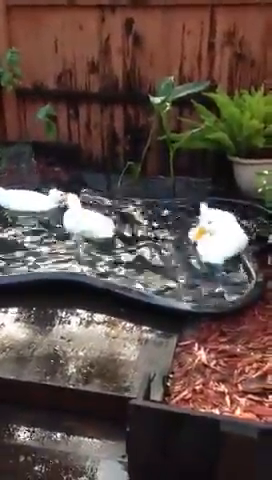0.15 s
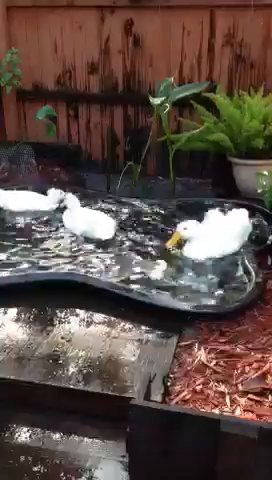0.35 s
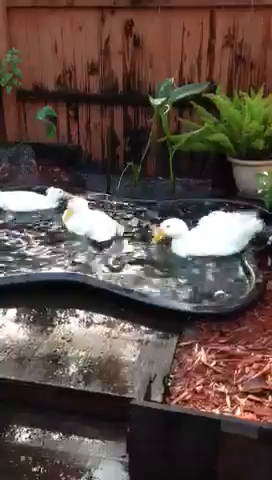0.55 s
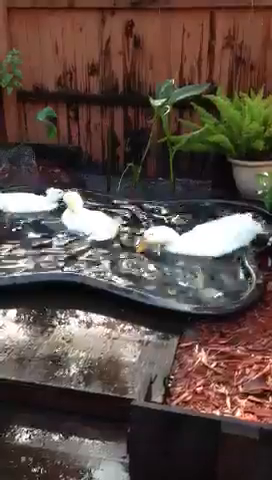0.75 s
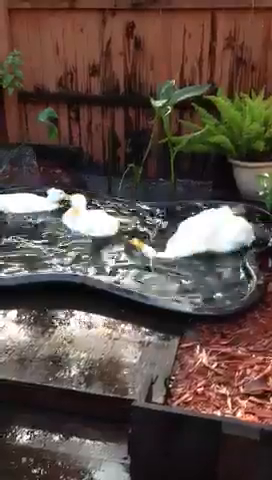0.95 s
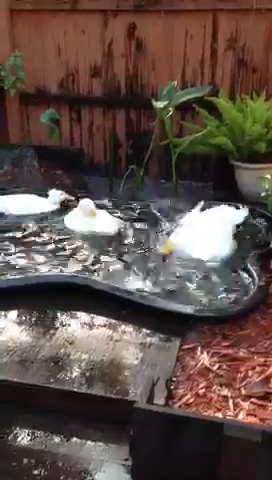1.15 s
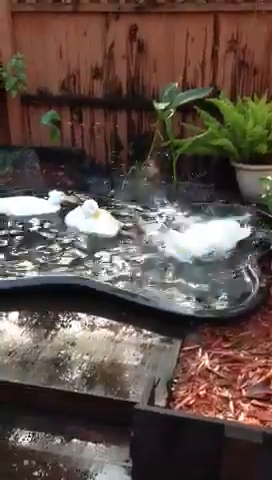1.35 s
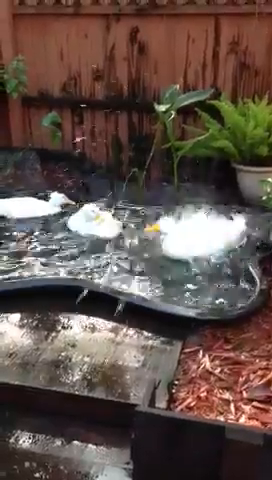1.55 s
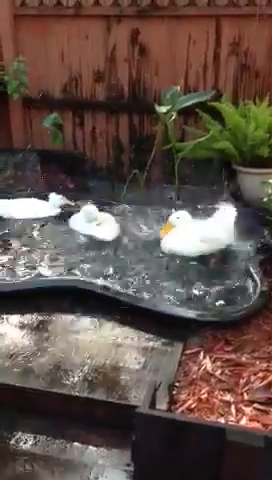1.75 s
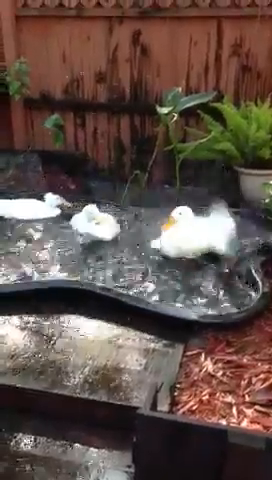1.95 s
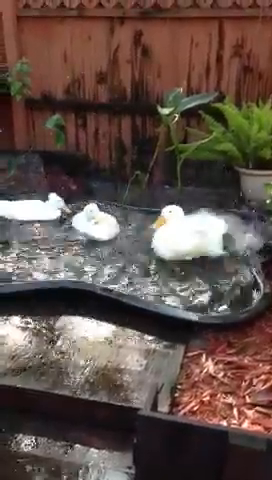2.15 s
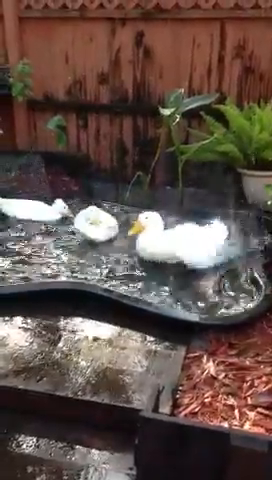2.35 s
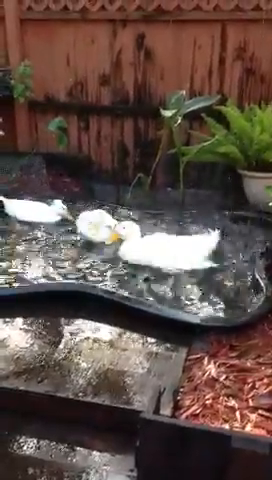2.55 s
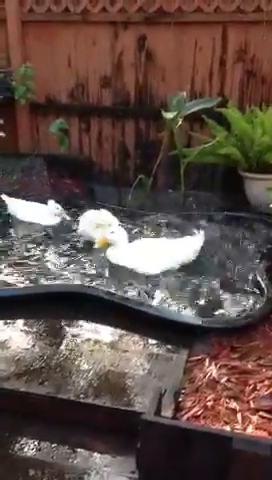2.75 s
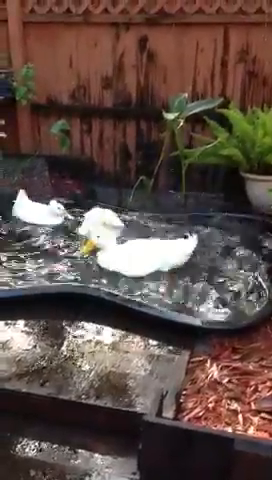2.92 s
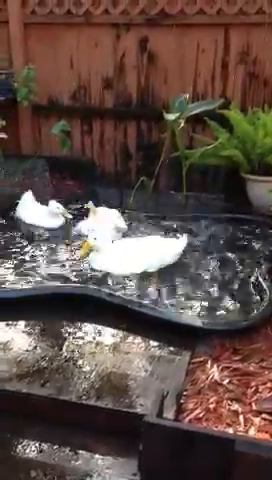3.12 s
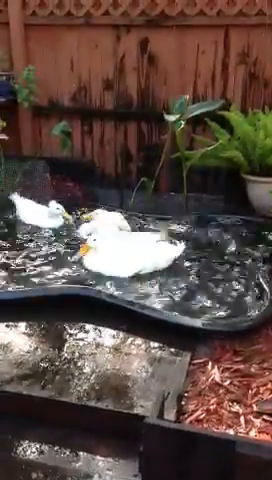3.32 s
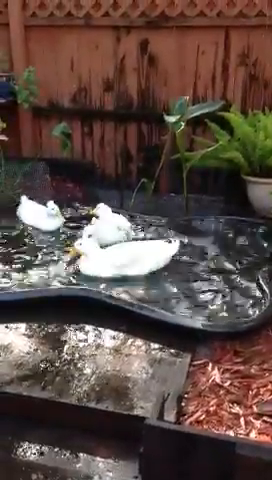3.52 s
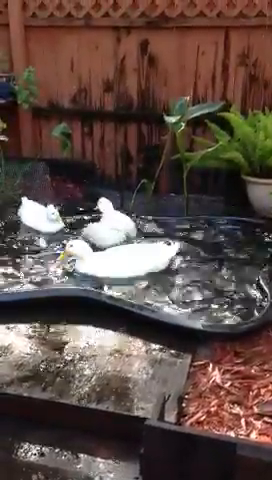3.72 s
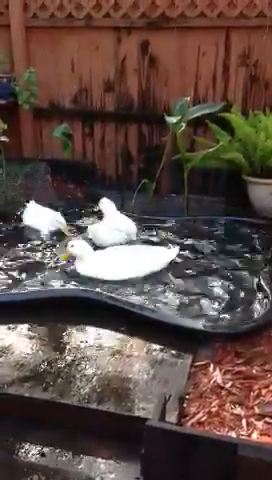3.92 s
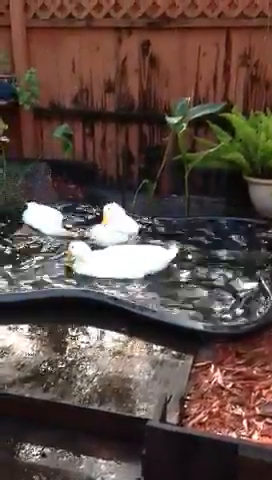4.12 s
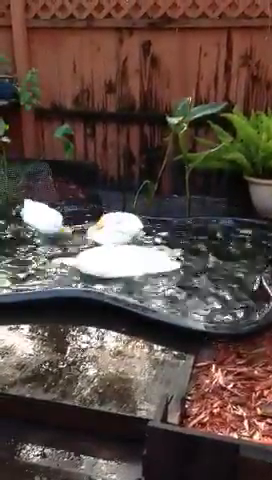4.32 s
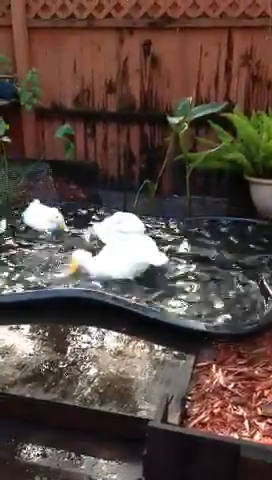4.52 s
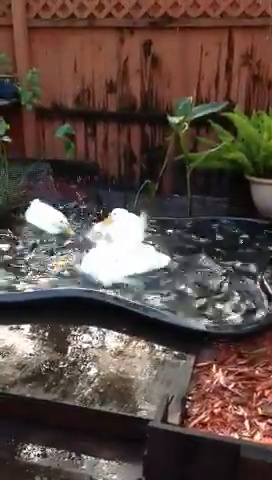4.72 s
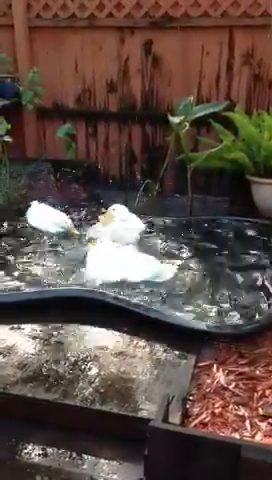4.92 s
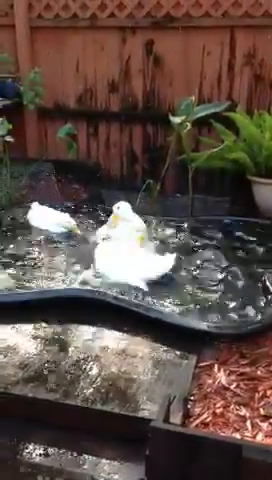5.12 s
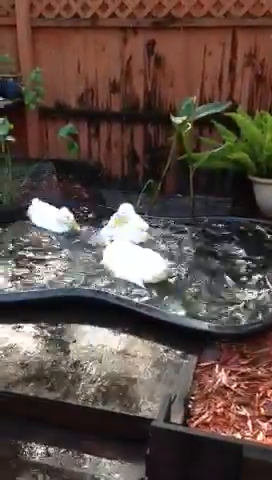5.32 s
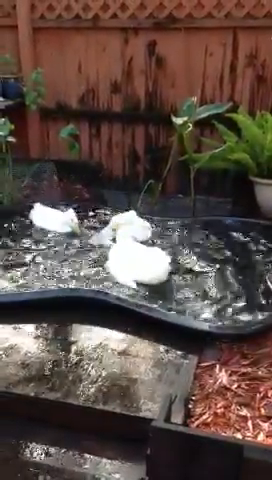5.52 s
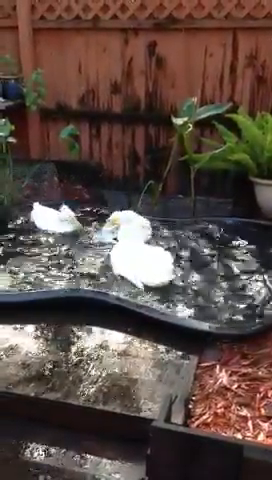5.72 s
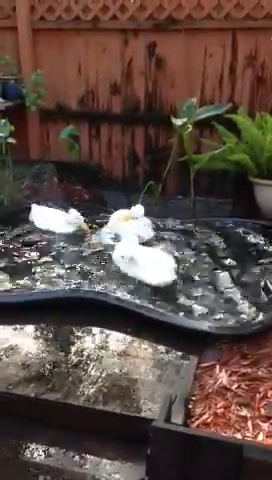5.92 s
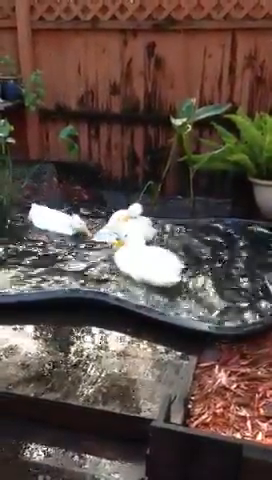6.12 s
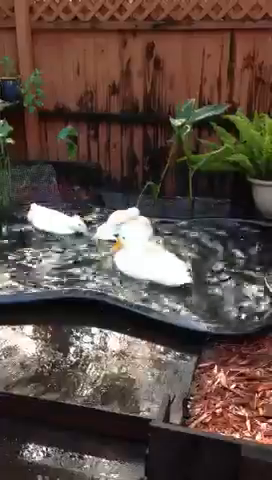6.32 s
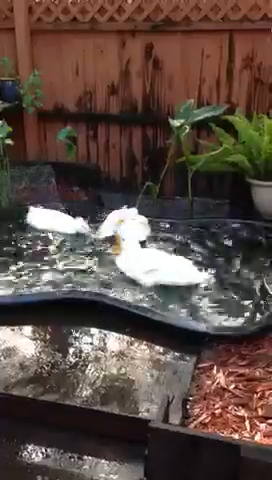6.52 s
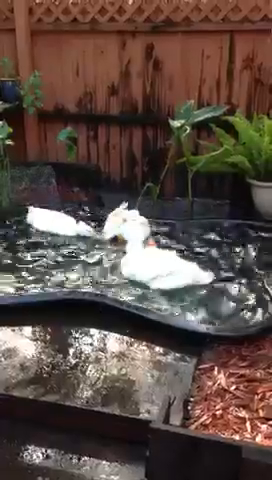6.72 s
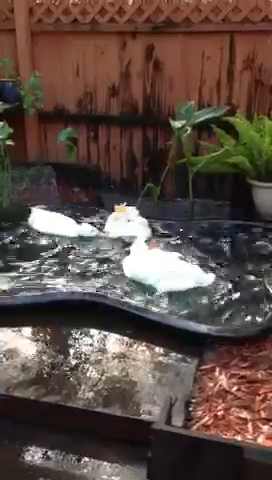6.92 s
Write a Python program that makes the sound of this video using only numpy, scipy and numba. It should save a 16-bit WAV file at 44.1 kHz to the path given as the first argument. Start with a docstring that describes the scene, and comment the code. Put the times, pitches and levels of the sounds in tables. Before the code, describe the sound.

Ducks bathe in a small garden pond, wings slapping and water splashing in bursts, with droplets, bubbling, brief low grunts and a distant machine hum.

```python
"""Ducks bathe in a small plastic garden pond a few metres from a phone. Their wings slap the water:
each slap is a snap, a ragged crack of noise and a low thump. Drops, bubbles and other short tones ring,
steady or gliding in pitch, and stirred water is many such rings mixed with hiss. A duck grunts, as pulses
and noise through a throat, and mutters in throbbing tones. Beyond the fence a machine idles as a set of
wavering tones, over distant traffic made of coloured noise."""
import sys
import numpy as np
from scipy import signal
from scipy.fft import rfft, irfft
from scipy.io import wavfile
from scipy.ndimage import uniform_filter1d
from numba import njit

SR = 44100
rng = np.random.default_rng(int(sys.argv[2]) if len(sys.argv) > 2 else 0)


def waveform_to_disk(signal):
    """Save audio, clipped to [-1, 1], as 16-bit WAV at the path in sys.argv[1]."""
    frames = np.transpose(np.atleast_2d(signal))
    scaled = np.clip(frames, -1, 1) * 32767
    samples = np.round(scaled).astype(np.int16)
    wavfile.write(sys.argv[1], SR, samples)


N = 306936  # length of the scene in samples

# wing and body slaps: t/s, crack level/dB, centre f/Hz, width/octaves, time to fall 60 dB/s,
# snap over crack level/dB, thump level/dB, thump f/Hz
SLAPS = [(1.268, -30, 2760, 1.16, 0.043, 0, -40, 196), (1.276, -22, 2070, 0.38, 0.024, 5, -39.5, 315),
         (1.2812, -26, 1960, 1.25, 0.017, 7, -62, 250), (1.284, -28, 7200, 0.55, 0.022, 1, -60, 250),
         (1.417, -41, 7000, .8, 0.02, 3, -45.5, 257), (1.477, -35, 3680, 0.86, 0.023, 5, -51, 250),
         (1.618, -32, 2380, 0.96, 0.018, 8, -60, 300), (1.625, -36, 1300, 0.86, 0.033, 5, -53, 298),
         (1.652, -40, 3000, 0.82, .02, 5, -60, 250), (1.713, -37, 2030, 0.46, 0.17, 11, -49, 255),
         (1.78, -31, 5500, 1.2, 0.023, 2, -45.5, 270), (1.906, -31.5, 2000, 1.8, 0.057, 4, -60, 250),
         (1.9133, -34.5, 2780, 2.6, 0.035, 18.5, -31, 200),
         (2.031, -19.5, 2450, 1.64, 0.024, 5.5, -29, 201), (2.161, -30, 1980, 2, 0.05, 8, -36.5, 284),
         (2.164, -36.5, 5700, 0.74, 0.027, 4, -58, 250), (2.28, -33, 1500, 2.9, 0.021, 3, -36.5, 172),
         (2.2852, -22.5, 2960, 1.66, 0.018, 6, -58, 252), (2.4317, -26.5, 2500, 5.9, 0.044, 4, -37, 211),
         (2.434, -29.5, 1860, 0.96, 0.015, 13, -62, 250), (4.6154, -28, 4500, 0.77, 0.016, 15.5, -58, 250),
         (4.749, -43, 2800, 3.3, .039, 9, -50, 250), (4.972, -33, 5600, 0.85, 0.017, 13, -66, 250),
         (4.981, -39, 4400, 0.88, 0.049, 3, -61, 250), (5.056, -41, 3300, 0.5, 0.017, 4, -60, 250),
         (5.2432, -43, 3480, 2.4, 0.04, 7, -50, 254)]
# the clearest drops: t of the peak/s, peak level/dB, f/Hz, length of the swell/cycles
DROPS = [(0.033, -48, 6330, 8), (.32, -50, 2000, 1.8), (0.3712, -41.5, 1670, 0.7), (.379, -58, 4740, 5),
         (0.797, -56, 5300, 5), (.828, -51, 5380, 6), (0.8956, -36.5, 4000, 1.65), (.898, -43, 1120, 1.5),
         (0.908, -46, 4950, 6.4), (.965, -47, 5680, 5.7), (.97, -48, 8180, 8), (1.029, -37, 9300, 4.7),
         (1.07, -36.5, 7060, 3.7), (1.102, -43, 900, 1.3), (1.117, -43, 1020, 2.6), (1.14, -41, 9000, 5.2),
         (1.156, -44, 3190, 6.4), (1.166, -39, 4390, 5.4), (1.171, -48, 1820, 7), (1.18, -44, 2070, 5),
         (1.1895, -36, 6500, 8), (1.212, -35, 4950, 7.9), (1.21, -35, 6400, 4), (1.222, -28.5, 3120, 3.7),
         (1.261, -31.5, 1300, 4), (1.34, -41, 1210, 4.8), (1.357, -36, 7750, 8), (1.402, -41, 2530, 8),
         (1.413, -42, 870, 4), (1.4177, -30, 5980, 8.8), (1.47, -32, 5300, 7.5), (1.504, -31.5, 2650, 4.6),
         (1.5273, -29.5, 6930, 4.6), (1.553, -40, 1150, 5), (1.569, -37, 7920, 7.6),
         (1.612, -30, 2700, 5.2), (1.6255, -29, 920, 2.3), (1.716, -32, 1570, 4), (1.73, -26, 4600, 1.8),
         (1.7171, -27, 4730, 4), (1.757, -34, 1650, 5), (1.76, -41, 1270, 3.2), (1.784, -45, 9250, 5),
         (1.82, -34.5, 7200, 5), (1.8195, -26, 4870, 1.5), (1.834, -39, 1765, 6.3), (1.915, -28, 5500, 2),
         (1.924, -29, 6000, 2.5), (2.0029, -30, 7400, 5), (2.085, -37, 1500, 3.3), (2.089, -42, 2320, 4),
         (2.142, -39.5, 1184, 12), (2.143, -32, 2750, 4), (2.211, -42, 1190, 5.8),
         (2.269, -32.5, 890, 2.24), (2.313, -35.5, 2030, 8), (2.341, -39, 1970, 8.6),
         (2.399, -40, 1380, 2.6), (2.449, -43, 3960, 6.5), (2.458, -34, 7000, 10), (2.534, -46, 4300, 6),
         (2.559, -42, 4390, 5.4), (2.5683, -35, 4600, 3.2), (2.574, -52, 1890, 6.6), (2.597, -52, 810, 5),
         (2.62, -38.5, 3300, 12), (2.627, -30.5, 4530, 2.7), (2.641, -32.5, 3290, 2.6),
         (2.651, -34.5, 10500, 7.5), (2.66, -48, 1050, 6.1), (2.683, -42, 2600, 7.4), (2.707, -52, 1920, 8),
         (2.704, -44, 4170, 15), (2.71, -37.5, 3120, 5.1), (2.752, -45, 3650, 3.8),
         (2.766, -39.5, 3120, 3.6), (2.838, -37.5, 4540, 4), (2.87, -52, 3200, 9), (2.899, -46, 3875, 5.2),
         (2.909, -40.5, 6460, 8.7), (3.006, -37, 5400, 3.2), (3.2716, -49, 5840, 13),
         (3.295, -44, 4650, 2.5), (3.3426, -47, 2870, 3.7), (3.381, -48, 2640, 3.2), (3.68, -52, 7160, 6.4),
         (4.0285, -47, 8400, 5), (4.121, -38, 6300, 3.4), (4.174, -42, 7000, 6), (4.144, -49, 5430, 7.8),
         (4.201, -55, 2690, 10.6), (4.21, -48.5, 1730, 2.3), (4.228, -49, 4940, 8.8), (4.259, -50, 6800, 7),
         (4.3134, -39, 3030, 1.54), (4.478, -45.5, 5600, 12), (4.53, -33.5, 9400, 4.5),
         (4.5308, -42, 2210, 3.8), (4.552, -45.5, 1040, 4), (4.565, -44, 2840, 9.8), (4.568, -46, 2020, 9),
         (4.588, -46, 1190, 5.6), (4.59, -40, 3210, 5), (4.606, -48, 1190, 6.9), (4.62, -47, 860, 5.7),
         (4.634, -38, 2800, 10.6), (4.653, -42, 2630, 12), (4.661, -43, 1950, 8), (4.632, -39, 6680, 9.8),
         (4.6499, -37, 5950, 12), (4.6913, -38, 5420, 3.8), (4.717, -47, 2670, 12), (4.752, -42, 5380, 8),
         (4.76, -40, 2900, 6.8), (4.765, -41.5, 3330, 12), (4.7504, -37, 1960, 3.97),
         (4.852, -47, 1340, 3.1), (4.9248, -41, 4600, 8.3), (4.946, -39.5, 3460, 7.1),
         (5.004, -46, 2090, 6.3), (5.051, -34.5, 7550, 11), (5.073, -43, 3930, 7.9),
         (5.091, -39, 6500, 7.1), (5.098, -40, 3320, 12), (5.113, -43, 7550, 7), (5.124, -39, 2900, 9.4),
         (5.187, -40, 7000, 3), (5.208, -42, 4000, 8.7), (5.215, -44, 7000, 3), (5.242, -31.5, 9830, 4),
         (5.242, -38.5, 3920, 7), (5.245, -39.5, 2520, 6.4), (5.266, -40, 8850, 4.5), (5.297, -31, 3080, 4),
         (5.31, -43, 5040, 5), (5.3232, -30, 10900, 2.2), (5.301, -46, 8870, 7), (5.323, -40, 7230, 5),
         (5.346, -50, 4820, 7.7), (5.3548, -44, 6740, 5.4), (5.355, -45, 8830, 7), (5.381, -51, 4560, 10),
         (5.438, -49, 1480, 6), (5.47, -46, 4200, 4), (5.597, -52, 4900, 6.3), (5.661, -56, 1580, 8),
         (5.737, -54, 6070, 6), (5.825, -55, 1530, 7), (5.8442, -49, 11500, 9), (5.885, -51, 4950, 4),
         (5.913, -59, 2110, 10), (5.9133, -46, 4850, 3.2), (5.981, -52, 820, 4), (6.0652, -50, 6450, 7.4),
         (6.129, -54, 1040, 5), (6.228, -44, 6200, 2.8), (6.2373, -48, 5170, 12), (6.287, -49, 4300, 6.8),
         (6.3293, -50, 2860, 4), (6.3855, -52, 3560, 3), (6.468, -53, 5770, 6.7), (6.564, -51, 7100, 8),
         (6.672, -51, 4220, 8.4), (6.683, -54, 6850, 7), (6.697, -56, 3370, 9), (6.755, -49, 6030, 8.7),
         (6.777, -49, 2930, 7.4), (6.834, -50, 3720, 8.3), (6.88, -48, 3340, 6.5), (6.894, -45, 4790, 34),
         (6.903, -51, 2690, 8.2)]
# bubbles and other short ringing tones, steady or gliding in pitch:
# t/s, peak level/dB, first f/Hz, f once 30 dB down/Hz, time until then/s
RINGING_TONES = [(0.526, -57, 1300, 2100, 0.036), (1.036, -33, 2560, 2640, 0.0083),
                 (1.053, -41, 798, 813, 0.049), (1.074, -45, 822, 1450, 0.045),
                 (1.221, -38.5, 282, 302, 0.024), (1.391, -42, 644, 745, 0.029),
                 (1.428, -33, 2020, 2100, 0.015), (1.437, -33, 1000, 1080, 0.011),
                 (1.487, -35, 995, 1510, 0.025), (1.503, -36, 1500, 3000, 0.01),
                 (1.617, -39, 820, 875, 0.014), (1.836, -42.5, 1010, 1400, 0.033),
                 (1.893, -30, 310, 266, 0.016), (2.158, -32.5, 1030, 1070, 0.018),
                 (2.265, -38, 272, 302, 0.019), (2.426, -33, 880, 910, 0.039),
                 (2.427, -30, 570, 610, 0.015), (2.492, -36.5, 710, 810, 0.0068),
                 (2.532, -48, 1216, 1610, 0.027), (3.376, -44, 520, 640, 0.033),
                 (3.533, -50, 1206, 1200, 0.036), (4.311, -43.5, 916, 960, 0.01),
                 (4.491, -39.5, 2600, 2600, 0.013), (4.506, -55, 2600, 2500, 0.015),
                 (4.691, -36.5, 690, 790, 0.0063), (4.745, -40, 1140, 1270, .014),
                 (4.812, -36, 308, 335, 0.028), (4.89, -47, 937, 990, 0.046),
                 (4.938, -45.5, 812, 855, 0.04), (4.984, -54, 1400, 2200, .014),
                 (5.071, -41.5, 2120, 2180, 0.022), (5.08, -41, 1700, 1760, 0.013),
                 (5.116, -42.5, 1950, 2000, 0.017), (5.138, -40, 2860, 2840, 0.019),
                 (5.248, -41.5, 1005, 940, 0.02), (5.267, -41.5, 990, 1100, 0.017),
                 (5.413, -42.5, 437, 573, 0.027), (5.425, -46, 1980, 2050, 0.0099),
                 (5.423, -36, 452, 1455, 0.058), (5.815, -35.5, 319, 343, 0.036),
                 (5.96, -65, 2060, 2090, 0.065), (6.078, -52, 2450, 2500, 0.01),
                 (6.219, -44, 2000, 2300, 0.003), (6.42, -42.5, 315, 337, 0.028)]
# water left moving between surges: t/s, level/dB, brightness (spray over churn)/dB
WASH = [(0, -69, 1), (.27, -73.5, -4), (.8, -71, 5), (1.1, -70, 14), (1.2, -53, -4.5), (1.37, -54.5, -3.5),
        (1.55, -52, 0.5), (1.85, -52, 5), (2.2, -50.5, 0), (2.5, -53, 2), (2.8, -64, 5), (3.1, -70.5, 2.5),
        (3.7, -71.5, 9), (4.4, -75, 4), (4.56, -60.5, 5), (4.85, -59, 3), (5.25, -58.5, 3),
        (5.4, -69.5, -10), (5.6, -72, 1), (6.6, -73.5, 4), (6.96, -66, 2)]
# surges of thrown water: t of the peak/s, level/dB, brightness (spray over churn)/dB, length/s
SURGES = [(0.365, -63.5, 7, 0.053), (0.47, -66, 1, 0.025), (0.55, -76.5, -29, 0.059),
          (0.673, -65, -2, 0.065), (0.794, -71.5, 19, 0.033), (0.9, -62.5, 8, 0.061),
          (1.019, -58, -3, 0.085), (1.108, -63.5, -17, .03), (1.181, -46, 3, 0.061),
          (1.286, -43.5, -0.5, 0.065), (1.426, -45.5, -1.5, 0.049), (1.497, -45, -4, 0.088),
          (1.631, -44.5, 3, 0.14), (1.742, -42.5, 5, 0.081), (1.912, -37, 2, 0.039), (1.936, -55, -3, 0.02),
          (2.027, -54, -17, 0.042), (2.124, -62, -1, .03), (2.165, -48, 14.5, 0.034),
          (2.268, -45.5, 1, 0.049), (2.346, -51.5, -15, 0.04), (2.443, -53.5, -13, 0.059),
          (2.63, -51.5, 0, 0.045), (2.702, -55.5, 3, 0.033), (2.755, -55, 6, 0.026),
          (2.934, -67.5, 25, 0.18), (3.109, -71.5, 28, 0.038), (3.281, -61.5, 6, 0.018),
          (3.382, -62.5, -5, 0.088), (3.459, -62, 9, 0.072), (3.608, -62.5, -2, 0.089),
          (3.672, -62, 4, 0.073), (4.12, -64.5, 22.5, 0.061), (4.227, -65, 8, 0.066),
          (4.49, -69, 24, 0.025), (4.58, -65, -16, 0.033), (4.655, -53.5, 5, 0.11),
          (4.775, -52.5, 2, 0.044), (4.888, -62.5, -19, .04), (4.955, -59.5, 3, 0.079),
          (5.055, -54, 7, 0.046), (5.115, -52.5, 7.5, 0.11), (5.274, -52.5, -1.5, 0.053),
          (5.424, -63.5, 15, 0.13), (5.85, -73, 14, 0.047), (6.07, -71, 11, 0.04), (6.285, -69, -13, 0.18),
          (6.39, -70, 17, 0.036), (6.555, -73, 16, 0.018), (6.677, -68, 16, 0.016), (6.78, -60.5, 2, 0.14),
          (6.891, -58.5, 15, 0.034)]
# tone colours of deep churn, middling fizz and bright spray: f/Hz, relative level/dB
CHURN = [(350, -12.5), (600, -11.5), (1000, -0.5), (1500, 2), (2000, 4.5), (2600, -8), (3500, -17)]
FIZZ = [(1500, -8), (2100, -10), (2700, -1.5), (4000, -3.5), (5000, -9.5), (6500, -33)]
SPRAY = [(3000, -8.5), (4200, -2.5), (5200, -1), (7500, -1.5), (10000, -6), (13500, -11), (16000, -24)]
# low grunts: t of the first strong pulse/s, pulse rate there/Hz, level/dB, stretch of the shape/times
GRUNTS = [(3.2943, 142.2, -42, 1.05), (3.3986, 119.7, -43.5, 0.76)]
# loudness shape of a grunt: t from that pulse/s, level/dB
GRUNT_SHAPE = [(-.03, -11), (-.003, -9), (-.001, 0.5), (.014, 0), (.026, -6.5), (.04, -25), (.05, -60)]
# resonances of the duck's throat: f/Hz, width/Hz, level/dB
GRUNT_THROAT = [(278, 62, -0.5), (590, 210, -1.5), (980, 160, 9), (1450, 100, -6), (2010, 200, -11)]
# soft mutters: t/s, length/s, pitch f/Hz, throb f/Hz, level/dB
MUTTERS = [(3.587, 0.074, 503, 42, -67.5), (5.999, 0.05, 501, 30.2, -68), (6.254, 0.069, 497, 68, -66)]
# tones in a mutter: multiple of the pitch, level/dB
MUTTER_ORDERS = [(2, 7), (3, 11.5), (4, 6), (5, 0), (6, -8), (7, -9), (8, -13)]
# echoes from the fence and pond rim: t/s, level/dB
FENCE = [(.004, -14), (0.012, -17), (.021, -18)]
# the machine's tones, one entry each: multiple of the shaft rate
IDLE_ORDERS = (7, 8, 9, 11, 12, 14)
# level of each of those tones while the hum is deep, then once it is thinner: level/dB
IDLE_DEEP = (-57, -65.5, -63.5, -71.5, -79, -70.5)
IDLE_THIN = (-58.5, -70, -95, -74, -63.5, -66)
# how fast each of those tones fades at the end: fade/(dB per s)
IDLE_FADE_DB_PER_S = (6.4, 1.7, 0.1, 0.1, 1.8, 11)
# tone colour of the traffic: f/Hz, relative level/dB
TRAFFIC = [(20, -12.5), (40, 2), (70, -8.5), (95, -6.5), (125, -0.5), (170, 0.5), (270, -1.5), (480, -7),
           (630, -4), (830, -5), (1100, -12), (1600, -20), (2500, -26), (4500, -29.5), (8000, -27.5),
           (15500, -28.5)]
# loudness of the traffic: t/s, level/dB
TRAFFIC_LEVEL = [(0, -55.5), (1.5, -57), (4, -56), (5.2, -56.5), (6.96, -56.5)]

SLAP_BUILD, SLAP_RAGGED_DB = 0.056, 3  # build-up as a share of the 60 dB fall time; uneven level
DROP_GLIDE = .96, 1.1  # first and last pitch against the listed one
# smaller drops around each clear one: level, and spreads of time, pitch and level
SPATTER_DB, SPATTER_S, SPATTER_OCTAVES, SPATTER_SCATTER_DB = -14, .008, .35, 4
SWELL_SHARE, SWELL_PER_OCTAVE = 0.15, 0.32  # share of the length: the wider the glide, the later the peak
OVERTONE, OVERTONE_DB = 1.63, -18.5  # multiple of the pitch; level for a glide of one octave
TONE_WOBBLE_DB = 1.7
SURGE_RISE, SURGE_FALL_DB = 0.62, 16.5  # rise time as a share of the length; fall over one length
FLICKER_DB, PATCHY_DB = 1.5, 1.6  # fast and slow unevenness of the froth
STRAY_DROPS_DB = -12  # scattered drops, against the level of the wash
STRAY_CLICKS_DB = -21  # the smallest drops only click; against the level of the spray
GRUNT_SAG_OCTAVES_PER_S = 17
GRUNT_JITTER, GRUNT_UNEVEN_DB = .025, 1.5  # spread of the pulse rate (a share), of the pulse level
GRUNT_BREATH = .36  # size of the breath noise beside the pulses
MUTTER_THROB_DB = 3.5  # wander of each tone's level
IDLE_HZ, IDLE_WAVER_DB = 22.43, .9
IDLE_TURN_S, IDLE_TURN_LENGTH_S = 2.93, .8  # middle and length of the turn to a thinner hum
IDLE_FADE_S = 4.25  # start of the fade
TRAFFIC_FLUTTER_DB = .7
MIC_LOW_HZ, TOP_HZ = 110, 15500


def undb(db):
    """Turn decibels into a multiplier."""
    return 10 ** (np.asarray(db) / 20)


def curve(rows):
    """Join the rows of a timed table with straight lines, one value per sample for each column."""
    s, *columns = np.transpose(rows)
    return [np.interp(np.arange(N) / SR, s, c) for c in columns]


def colour(x, points):
    """Shape the strength of each frequency by a colour table, then set the rms to 1."""
    hz, db = np.transpose(points)
    f = np.arange(N // 2 + 1) * SR / N + 1
    gain = undb(np.interp(np.log(f), np.log(hz), db))
    y = irfft(rfft(x) * gain, N)
    return y / np.std(y)


def walk(rate, size=N):
    """Wander smoothly between random levels, `rate` of them a second, with a spread near 1."""
    k = int(SR / rate)
    steps = np.repeat(rng.standard_normal(size // k + 1), k)
    smooth = uniform_filter1d(uniform_filter1d(steps, k), k)
    return 1.28 * smooth[:size]


@njit
def rings(n, start, size, hz0, hz1, swell, fade):
    """Each ring swells, then falls 30 dB per fade, while its pitch glides; times are in samples."""
    y = np.zeros(n)
    for k in range(len(start)):
        first = int(start[k])
        length, phase = swell[k] + fade[k], 0.
        for i in range(min(int(swell[k] + 2 * fade[k]), n - first)):
            hz = hz0[k] * (hz1[k] / hz0[k]) ** (i / length)
            phase += 2 * np.pi * hz / SR
            if i < swell[k]:
                shape = i / swell[k]
            else:
                shape = np.exp(-np.log(1000) / 2 * (i - swell[k]) / fade[k])
            y[first + i] += size[k] * shape * np.sin(phase)
    return y


def slaps():
    """Water tears open in a ragged crack; air trapped under the wing thumps just ahead of it."""
    y, t = np.zeros(N), (np.arange(4096) - 1024) / SR  # contact is at t = 0
    f = np.arange(2049) * SR / 4096 + 1
    for s, db, hz, octaves, t60, snap_db, thump_db, thump_hz in SLAPS:
        # a hump around the centre, tilted towards the bass but weak below 420 Hz
        hump = np.exp(-.5 * (np.log2(f / hz) / octaves) ** 2)
        tone = hump / f ** 0.32 / np.hypot(1, (420 / f) ** 2)
        crack = irfft(rfft(rng.standard_normal(4096)) * tone)
        crack = crack * undb(SLAP_RAGGED_DB * walk(400, size=len(t)))
        shape = np.exp(np.where(t < 0, t / (SLAP_BUILD * t60), -np.log(1000) * t / t60))
        # the instant of contact is a single snap of the same colour
        snap = np.roll(irfft(1j * tone), shift=1024)
        hit = shape * crack / np.std(crack) + undb(snap_db) * snap / snap.max()
        thump_shape = np.exp(np.where(t < -.003, (t + 0.00342) / 0.00067, -(t + 0.0058) / 0.01))
        thump = np.sin(2 * np.pi * thump_hz * t) * thump_shape
        i = int(s * SR) - 1024
        y[i:i + 4096] += undb(db) * hit + undb(thump_db) * thump
    return y


def drops():
    """Each drop is a few cycles that climb a little in pitch, amid a spatter of smaller ones."""
    s, db, hz, cycles = np.transpose(DROPS)
    late, pitch, size = rng.standard_normal((3, 5, len(DROPS)))  # five small drops per clear one
    s = np.append(s, s + SPATTER_S * late)
    db = np.append(db, db + SPATTER_DB + SPATTER_SCATTER_DB * size)
    hz = np.append(hz, np.minimum(hz * 2 ** (SPATTER_OCTAVES * pitch), TOP_HZ))
    length = np.resize(np.maximum(cycles, .8), len(hz)) * SR / hz
    start = np.maximum(s * SR - length, 0)
    return rings(N, start, undb(db), DROP_GLIDE[0] * hz, DROP_GLIDE[1] * hz, length, 2 * length)


def ringing_tones():
    """Bubbles and other short tones ring, steady or gliding; a wider glide has a louder faint overtone."""
    s, db, hz0, hz1, length = np.transpose(RINGING_TONES)
    octaves = np.log2(hz1 / hz0)
    swell = SWELL_SHARE + SWELL_PER_OCTAVE * np.abs(octaves)
    times = swell * length * SR, (1 - swell) * length * SR
    main = rings(N, s * SR, undb(db), hz0, hz1, *times)
    overtone = rings(N, s * SR, undb(db + OVERTONE_DB) * octaves,
                     OVERTONE * hz0, OVERTONE * hz1, *times)
    # the level wobbles unevenly
    return (main + overtone) * undb(TONE_WOBBLE_DB * walk(250))


def patter(count, low_hz, high_hz, cycles, glide, scatter_db):
    """Scatter random bubbles of a few cycles each, some much louder than the rest; rms 1."""
    when, pitch, long = rng.random((3, count))
    hz = low_hz * (high_hz / low_hz) ** pitch
    size = undb(scatter_db * np.minimum(rng.exponential(size=count), 3))
    fade = cycles * (0.37 + 1.56 * long) * SR / hz
    y = rings(N, when * N, size, hz, glide * hz, 0.26 * fade, fade)
    return y / np.std(y)


def froth(points, grains, share, flicker_hz):
    """Mix bubbles with a flickering hiss of the same colour, in uneven patches; rms near 1."""
    hiss = colour(rng.standard_normal(N) * undb(FLICKER_DB * walk(flicker_hz)), points)
    mix = np.sqrt(1 - share) * hiss + np.sqrt(share) * colour(grains, points)
    return undb(PATCHY_DB * walk(30)) * mix


def split(db, bright):
    """Share a level out as the power of churn, fizz and spray; brightness tips it towards spray."""
    return undb([db - bright / 2, db, db + bright / 2]) ** 2


def stir():
    """Gains of churn, fizz and spray: each surge swells over the wash and dies away."""
    t = np.arange(N) / SR
    power = split(*curve(WASH))
    for s, db, bright, length in SURGES:
        i, j = max(int((s - 4 * length) * SR), 0), int((s + 4 * length) * SR)
        late = (t[i:j] - s) / length
        shape = undb(-SURGE_FALL_DB * np.maximum(late, -late / SURGE_RISE))
        power[:, i:j] += np.outer(split(db, bright), shape ** 2)
    return np.sqrt(power)


def stirred():
    """Stirred water is a crowd of bubbles in hiss; the smaller the bubble, the higher and shorter it is."""
    churn, fizz, spray = stir()
    large = patter(count=7000, low_hz=451.0, high_hz=2610.0, cycles=10.1, glide=1.19, scatter_db=4.5)
    small = patter(count=7000, low_hz=1999.0, high_hz=4950.0, cycles=12.5, glide=1.18, scatter_db=3.5)
    ticks = patter(count=5000, low_hz=4030.0, high_hz=13300.0, cycles=3.6, glide=1.33, scatter_db=2.0)
    stray = patter(count=500, low_hz=1460.0, high_hz=11500.0, cycles=8.2, glide=1.1, scatter_db=8.0)
    clicks = patter(count=250, low_hz=3950.0, high_hz=11000., cycles=3.0, glide=1.4, scatter_db=4.0)
    return (churn * froth(CHURN, large, share=0.7, flicker_hz=71.8)
            + fizz * froth(FIZZ, small, share=0.56, flicker_hz=76.4)
            + spray * froth(SPRAY, ticks, share=0.39, flicker_hz=90.1)
            + undb(curve(WASH)[0] + STRAY_DROPS_DB) * stray
            + undb(STRAY_CLICKS_DB) * spray * clicks)


def grunts():
    """Uneven pulses that slow down ring the throat, with turbulent noise mixed in."""
    source = np.zeros(N)
    k = np.arange(int(GRUNT_SHAPE[0][0] * SR), int(2 * GRUNT_SHAPE[-1][0] * SR))
    for s, rate_hz, db, long in GRUNTS:
        hz = rate_hz * 2 ** (-GRUNT_SAG_OCTAVES_PER_S * k / SR)
        hz = hz * (1 + GRUNT_JITTER * walk(150, size=len(k)))
        # count whole turns, lined up so that one pulse falls on k = 0
        turns = np.floor(np.cumsum(hz / SR) - np.sum(hz[k <= 0] / SR) + 1e-6)
        pulses = np.diff(turns, prepend=turns[0]) * np.sqrt(SR / hz)
        uneven, breath = rng.standard_normal((2, len(k)))
        drive = GRUNT_BREATH * breath + pulses * undb(GRUNT_UNEVEN_DB * uneven)
        level_db = db + np.interp(k / SR / long, *np.transpose(GRUNT_SHAPE))
        source[int(s * SR) + k] = drive * undb(level_db)
    t = np.arange(2048) / SR
    throat = sum(undb(g) * np.exp(-np.pi * w * t) * np.sin(2 * np.pi * f * t) for f, w, g in GRUNT_THROAT)
    voice = signal.fftconvolve(source, throat / np.linalg.norm(throat))[:N]
    # a small throat radiates little below its first resonance and is dull above its last
    return signal.sosfilt(signal.butter(3, [190, 2500], "band", fs=SR, output="sos"), voice)


def mutters():
    """Short hoarse nasal notes with a missing fundamental, chopped into uneven throbs."""
    y = np.zeros(N)
    for s, length, hz, throb_hz, db in MUTTERS:
        i, t = int(s * SR), np.arange(int(length * SR)) / SR
        turns = hz * np.cumsum(1 + 0.0286 * walk(255, size=len(t))) / SR
        note = np.zeros(len(t))
        for multiple, tone_db in MUTTER_ORDERS:
            gain = undb(tone_db + MUTTER_THROB_DB * walk(72, size=len(t)))
            note += gain * np.sin(2 * np.pi * (multiple * turns + rng.random()))
        shape = np.sqrt(np.sin(np.pi * t / length)) * np.sin(np.pi * throb_hz * t) ** 2
        y[i:i + len(t)] += undb(db) * shape * note
    return y


def machine():
    """Multiples of the slow shaft rate beat and waver; the hum turns thinner, then fades."""
    t = np.arange(N) / SR
    thin = np.clip(.5 + (t - IDLE_TURN_S) / IDLE_TURN_LENGTH_S, 0, 1)
    fading_s = np.maximum(t - IDLE_FADE_S, 0)
    turns = np.cumsum(IDLE_HZ * (1 + 0.0021 * walk(1.42))) / SR
    hum = np.zeros(N)
    for k, deep_db, thin_db, fade in zip(IDLE_ORDERS, IDLE_DEEP, IDLE_THIN, IDLE_FADE_DB_PER_S):
        level_db = deep_db + thin * (thin_db - deep_db) - fade * fading_s + IDLE_WAVER_DB * walk(4.5)
        # the square root of 2 makes the level an rms one
        hum += np.sqrt(2) * undb(level_db) * np.sin(2 * np.pi * (k * turns + rng.random()))
    return hum


def traffic():
    """A distant rumble and hiss, nearly steady: random noise given the traffic's colour."""
    level_db = curve(TRAFFIC_LEVEL)[0] + TRAFFIC_FLUTTER_DB * walk(8)
    return undb(level_db) * colour(rng.standard_normal(N), TRAFFIC)


def echoes(near):
    """The fence and pond rim send back copies of the near sounds, each smeared by a burst of noise."""
    yard, t = np.zeros(4096), np.arange(4096) / SR
    for s, db in FENCE:
        smear = rng.standard_normal(4096) * np.exp(-np.abs(t - s) / 0.0033)
        yard += undb(db) * smear / np.linalg.norm(smear)
    return signal.fftconvolve(near, yard)[:N]


def scene():
    """Add the near sounds, their echoes, the stirred water and the background."""
    near = slaps() + drops() + ringing_tones() + grunts() + mutters()
    return (near + echoes(near) + stirred() + machine() + traffic())[None]


def record(dry):
    """The small microphone loses the bass; the phone cuts the top."""
    thin = signal.sosfilt(signal.butter(3, MIC_LOW_HZ, "high", fs=SR, output="sos"), dry)
    return signal.sosfilt(signal.ellip(10, .2, 60, TOP_HZ, fs=SR, output="sos"), thin)


dry = scene()
out = record(dry)
waveform_to_disk(out)
```